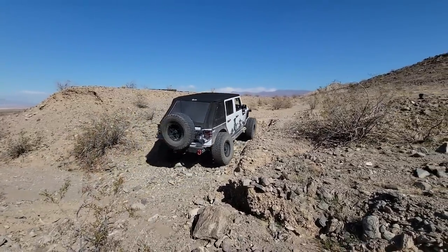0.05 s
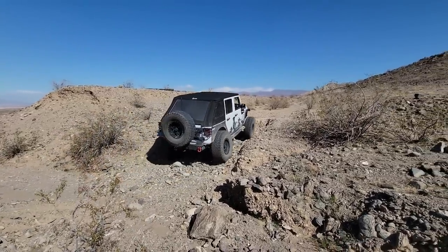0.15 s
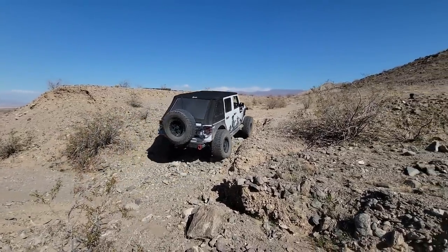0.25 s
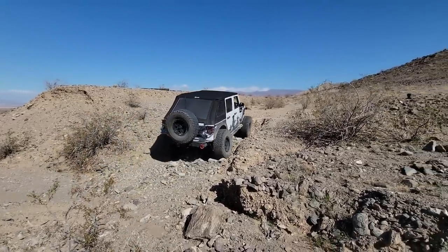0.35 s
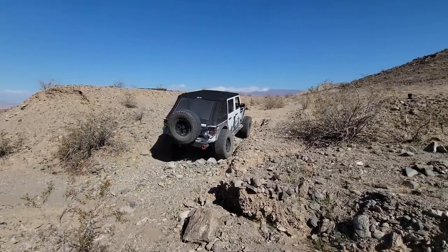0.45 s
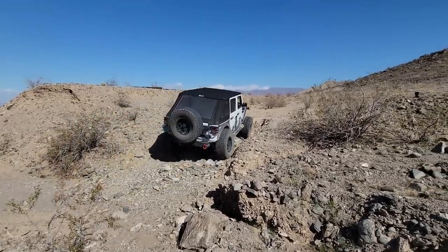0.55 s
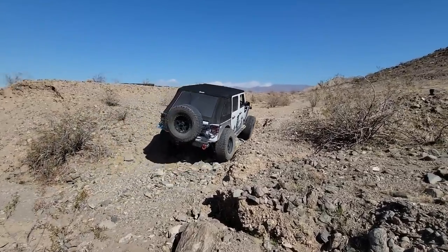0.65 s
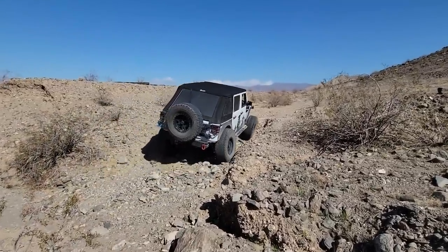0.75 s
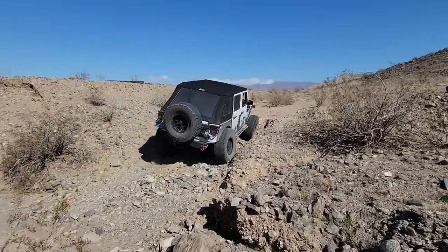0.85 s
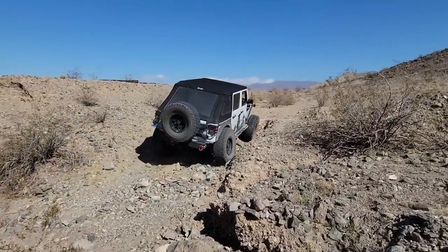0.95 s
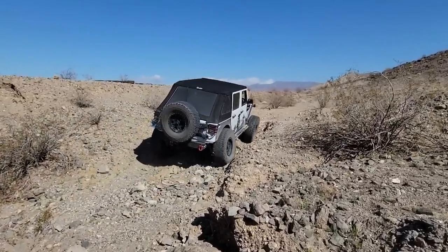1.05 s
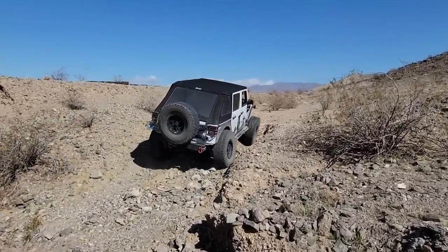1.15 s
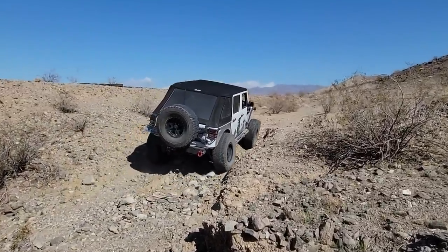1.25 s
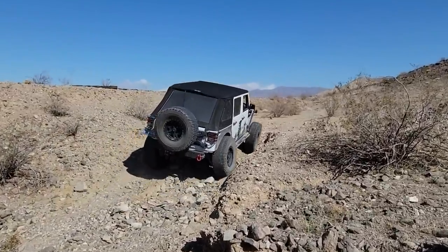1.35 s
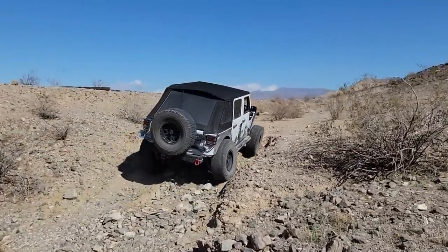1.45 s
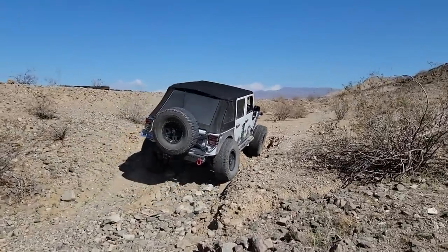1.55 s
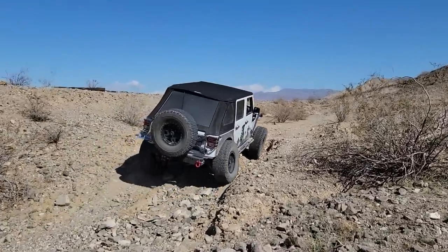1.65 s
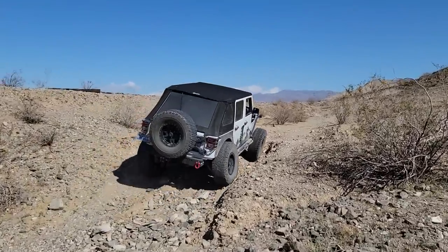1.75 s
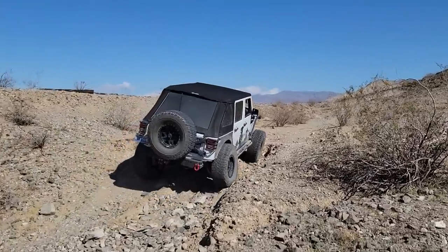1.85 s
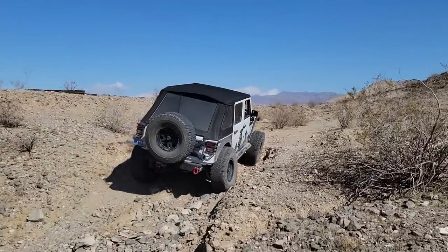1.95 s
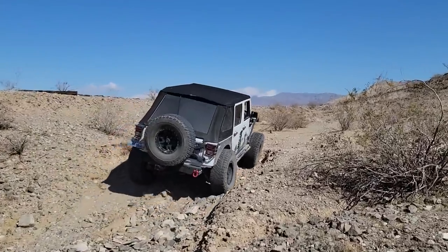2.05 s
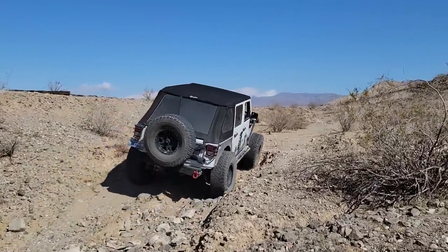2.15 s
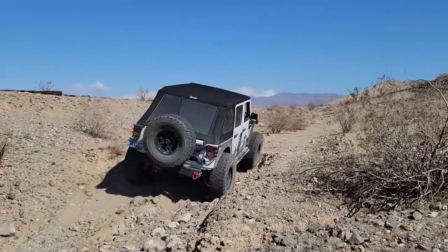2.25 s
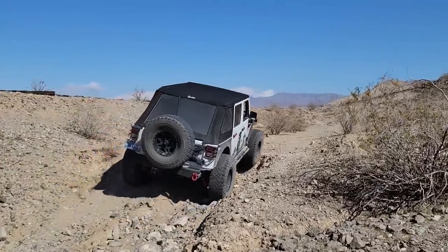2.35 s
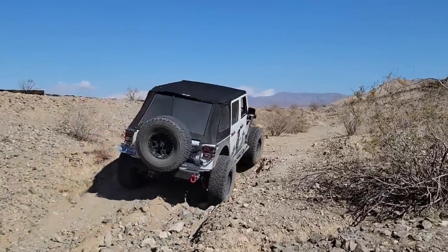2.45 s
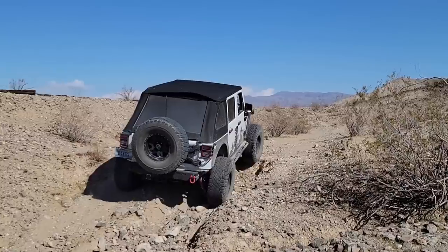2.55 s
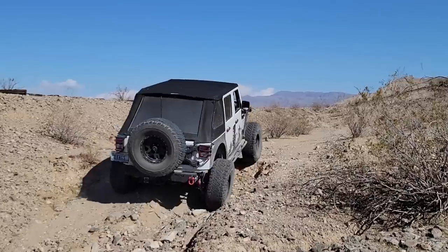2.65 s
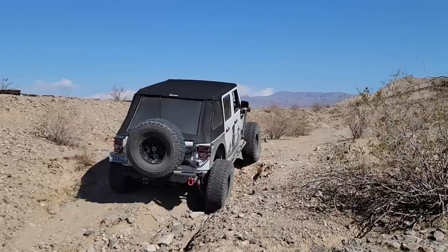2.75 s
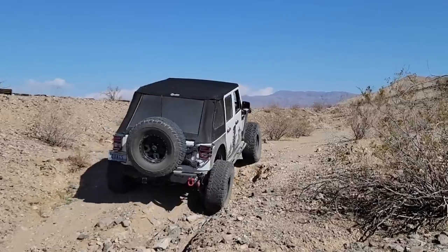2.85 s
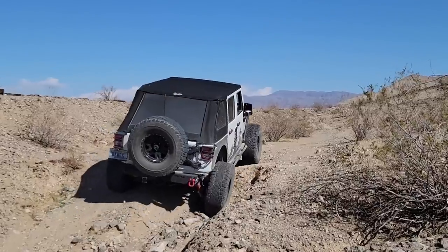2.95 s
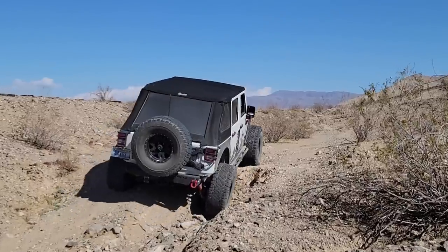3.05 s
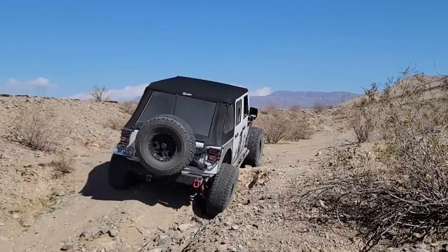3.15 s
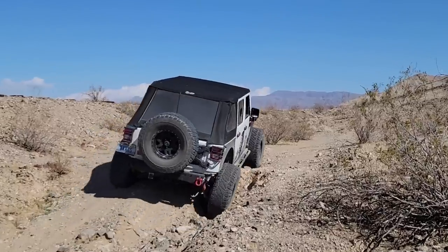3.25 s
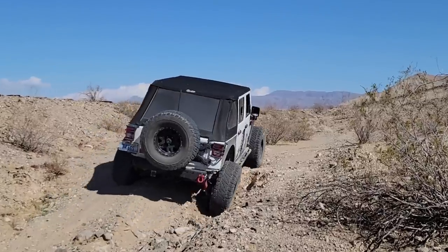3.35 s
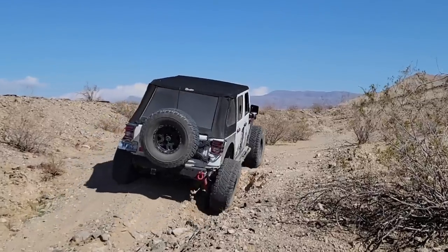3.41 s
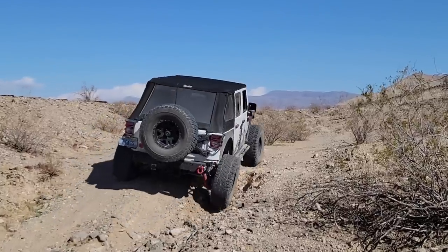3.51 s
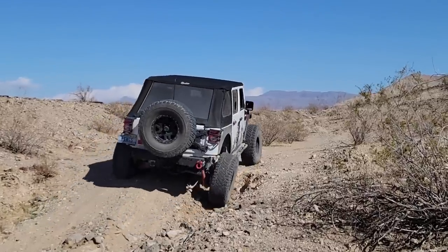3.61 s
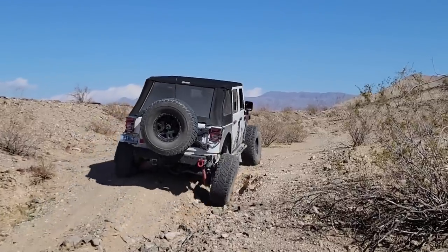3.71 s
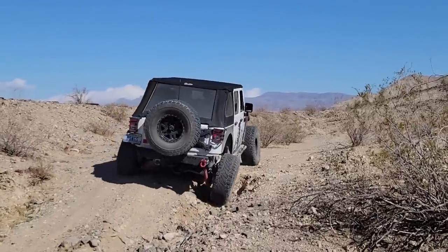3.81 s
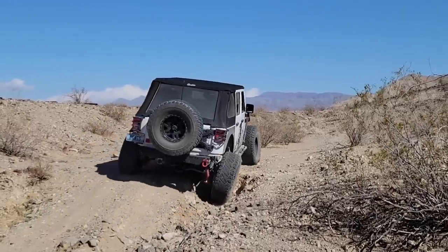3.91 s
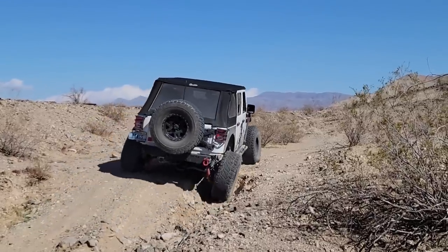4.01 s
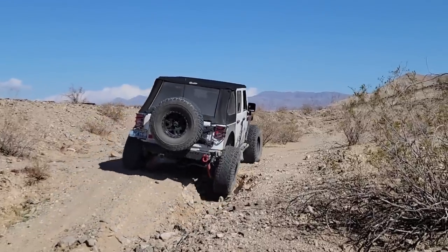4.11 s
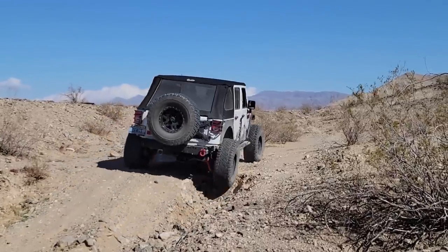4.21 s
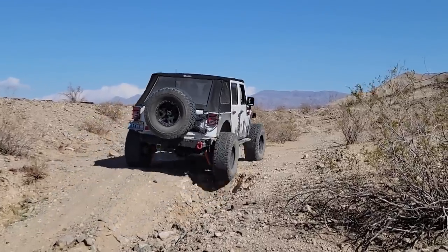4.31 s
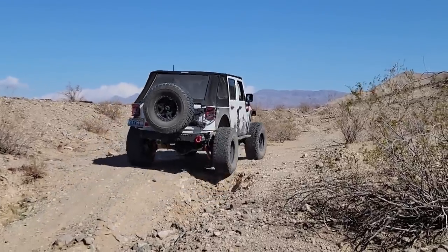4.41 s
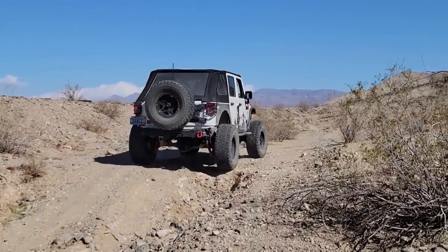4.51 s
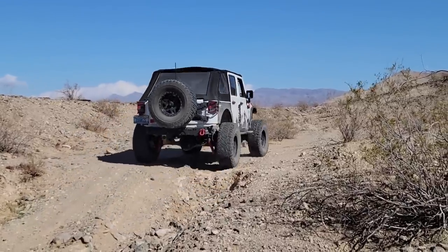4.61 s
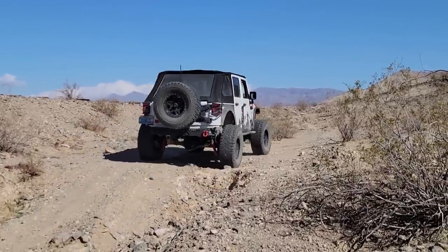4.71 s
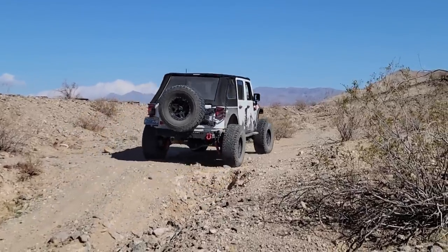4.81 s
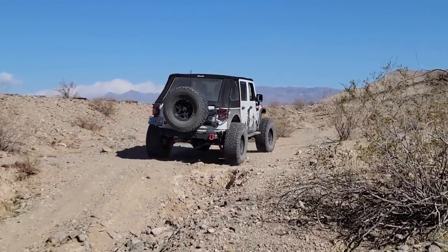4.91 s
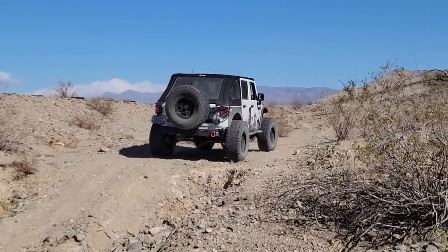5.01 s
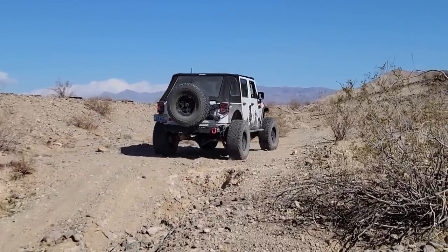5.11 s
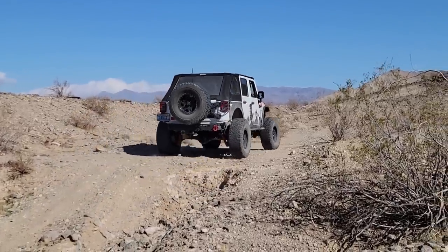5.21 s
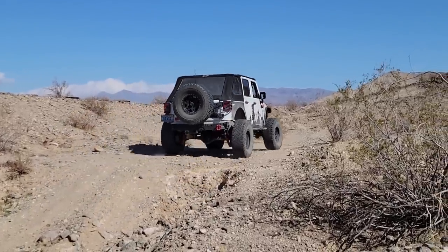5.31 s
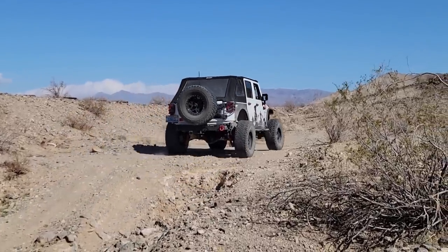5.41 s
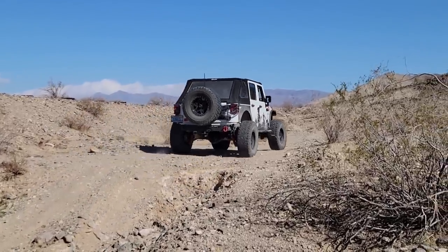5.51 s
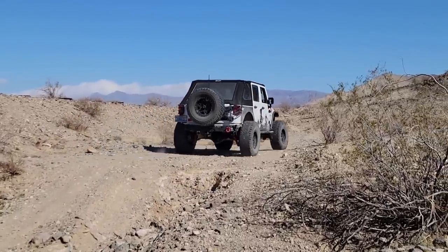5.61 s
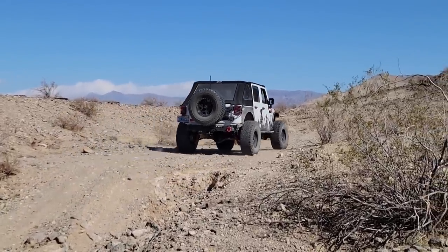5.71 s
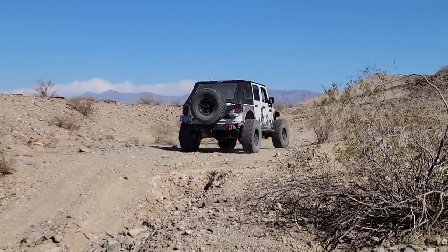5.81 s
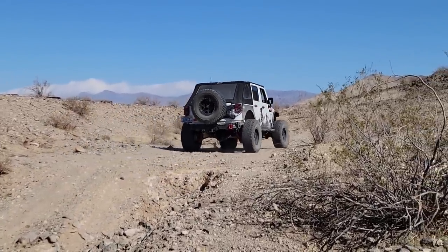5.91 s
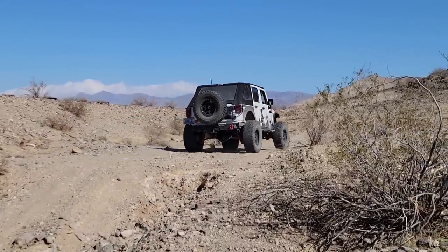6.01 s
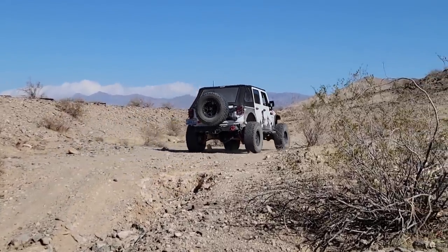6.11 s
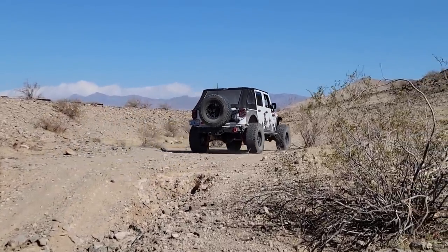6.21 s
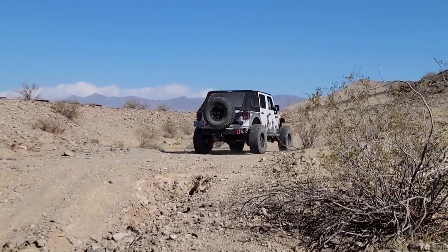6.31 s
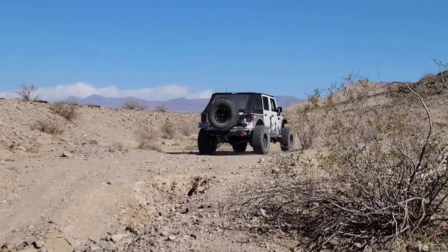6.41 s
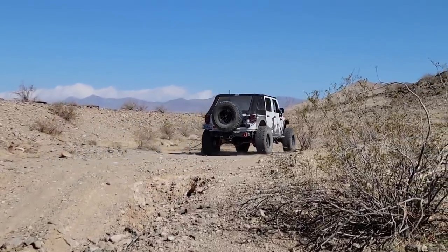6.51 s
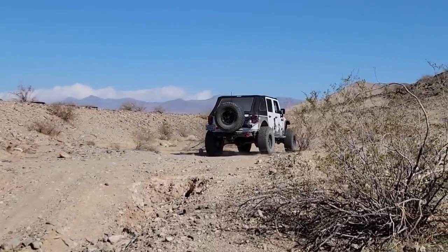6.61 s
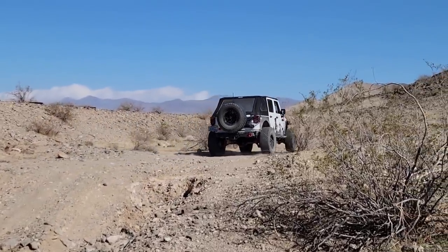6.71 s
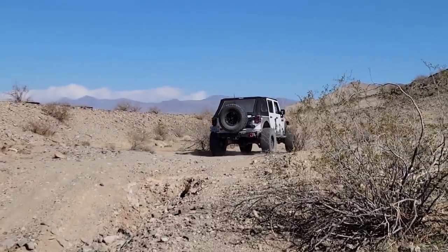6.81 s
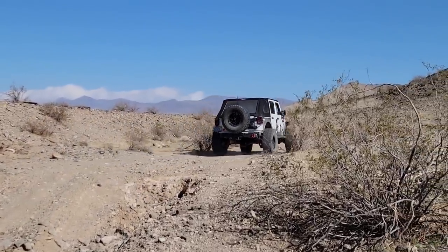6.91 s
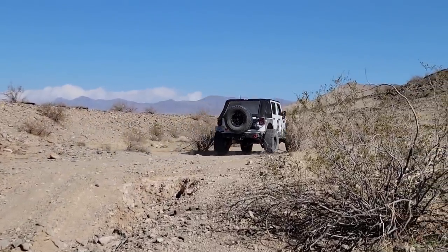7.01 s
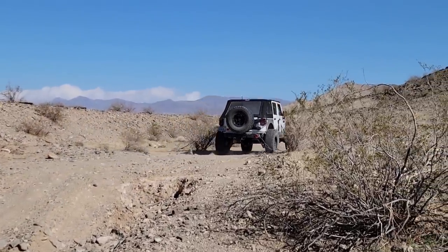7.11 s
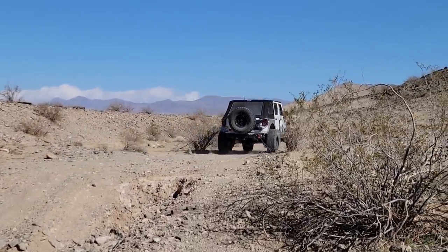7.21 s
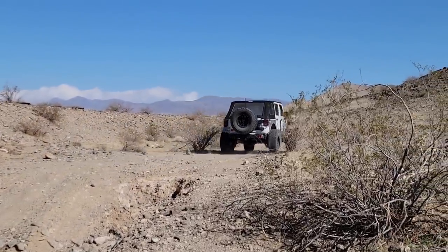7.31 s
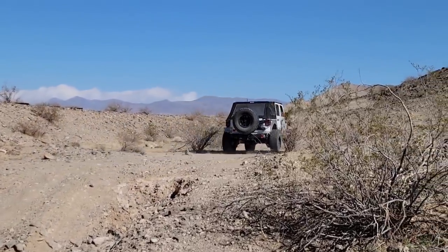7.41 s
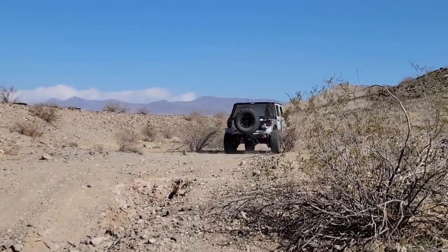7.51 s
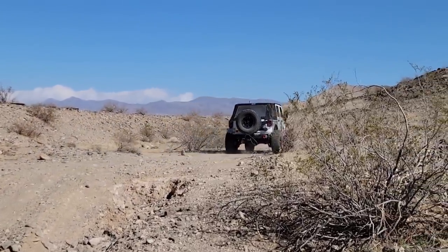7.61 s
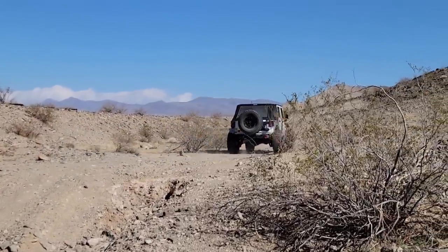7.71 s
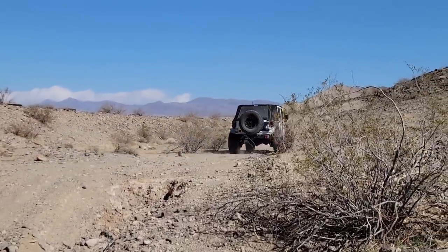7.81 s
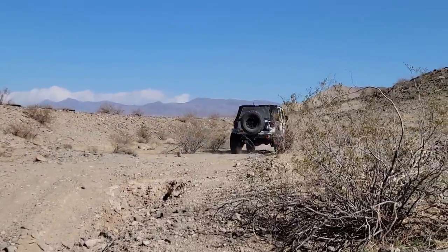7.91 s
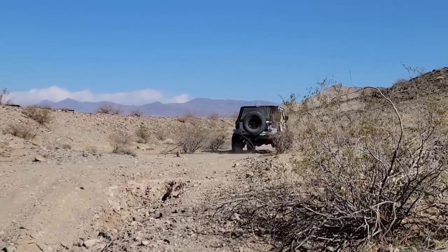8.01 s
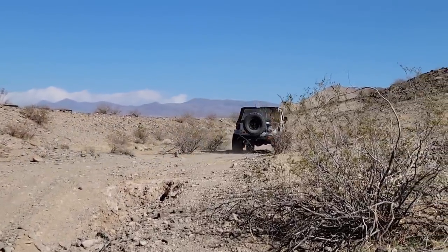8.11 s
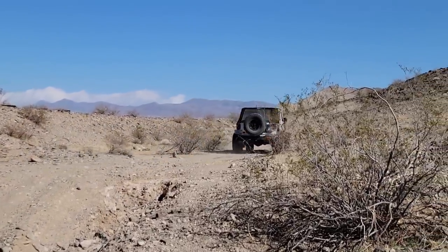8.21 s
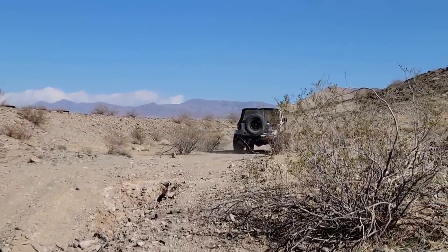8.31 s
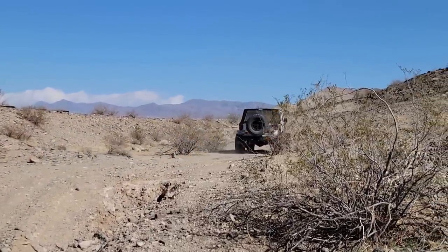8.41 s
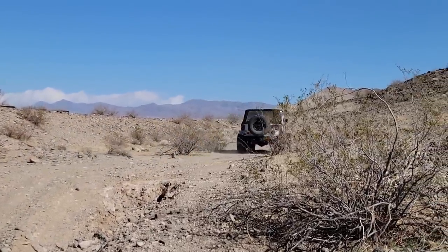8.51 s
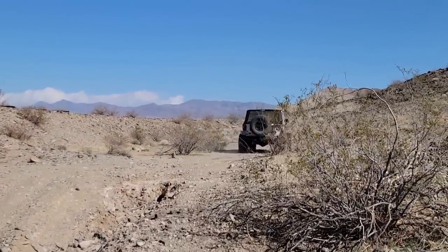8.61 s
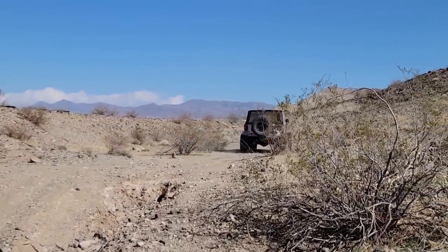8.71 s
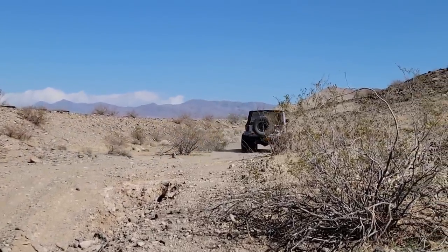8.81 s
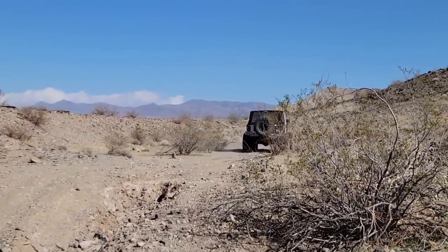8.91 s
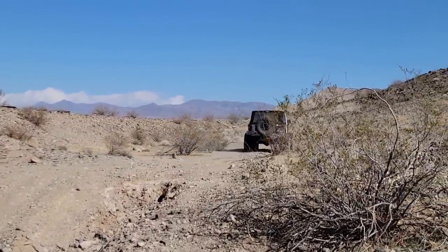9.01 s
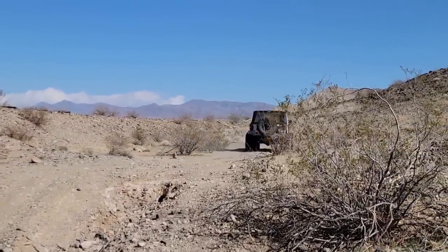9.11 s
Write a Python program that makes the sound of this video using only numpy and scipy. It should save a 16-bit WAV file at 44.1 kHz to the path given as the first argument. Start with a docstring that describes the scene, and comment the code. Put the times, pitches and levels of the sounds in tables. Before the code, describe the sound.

An off-road car climbs a rocky desert wash, heard in stereo by a phone behind it, with low breeze rumble and faint hiss. At 0 s metal chinks lightly over a low, throaty six-cylinder drone, which swells near 0.5 s, then sinks almost away around 1 s as gravel crunches and stones knock. Revs return by 1.3 s, with rubble crunching and clacks until 2 s. The engine eases, then surges loudest at about 2.7 s and sags by 3.5 s. Around 4 s wheels drop with soft, deep thuds; revs build again amid crunches, and a strong dull knock lands near 4.65 s. The engine pulls high and growling until about 5.6 s, then eases. Tyre noise fades after 6 s, the drone almost vanishing near 6.6 s. A brief, more distant rev rises at 7.2 s and dies by 8 s, leaving faint rumble, sparse ticks and weakening wind to about 9 s.

```python
"""Metal chinks and stones start to knock as a six-cylinder off-road car crawls up a rocky desert wash.
Its exhaust drones on multiples of one bank's firing rate, rising and falling with the revs; tyres grind
gravel in noisy bursts, thuds come as wheels drop off rocks, and the engine bay hisses behind them.
After about six seconds the tyre noise fades as the car drives off. All along, a breeze that weakens
towards the end rumbles on the two microphone ports of a phone, over a faint hiss."""
import sys
import numpy as np
from scipy import signal
from scipy.io import wavfile
from scipy.ndimage import uniform_filter1d

SR = 44100
rng = np.random.default_rng(int(sys.argv[2]) if len(sys.argv) > 2 else 0)


def inscribe(sig):
    """Save sig as 16-bit PCM at rate SR to the path in sys.argv[1].

    A 1-D sig is mono; a 2-D sig holds one channel per row.
    Samples are clipped to [-1, 1] before scaling.
    """
    pcm = np.round(np.clip(np.atleast_2d(sig).T, -1, 1) * 32767)
    wavfile.write(sys.argv[1], SR, pcm.astype(np.int16))


N = 403515
T = np.arange(N) / SR  # time of each sample in seconds

# Engine over time: [start_s, one_bank_firing_hz, drone_level_db, brightness_db_per_octave]
ENGINE_TIMES = [(0.0, 35.3, -27, 2.5), (0.25, 32.3, -21, 0), (0.53, 39.32, -16.5, -0.5),
                (0.69, 35.37, -29, 3), (1.02, 24.48, -44.5, 0.5), (1.09, 22.94, -38.5, 6),
                (1.27, 27.35, -17.5, -2), (1.5, 35.47, -19.5, -1), (1.58, 36.94, -20, 1.5),
                (1.76, 39.02, -20.5, -0.5), (2.09, 37.34, -22.5, -1), (2.47, 29.7, -24, 1.5),
                (2.73, 41.15, -12, 0), (2.85, 43.9, -15.5, -0.5), (3.39, 34.7, -26, 2),
                (3.64, 31.93, -25, -0.5), (4.3, 39.57, -18, 0.5), (4.92, 45.12, -16.5, -2),
                (5.63, 44.92, -24.5, 1.5), (5.94, 40.44, -30.5, -2.5), (6.55, 38.84, -50, -4.5),
                (6.62, 35.88, -47.5, -2.5), (6.88, 32.84, -42, -2), (7.08, 41.31, -29, 2.5),
                (7.21, 45.66, -21.5, -1), (7.39, 45.0, -29.5, 1), (7.52, 40.67, -31.5, -1.5),
                (8.03, 39.94, -47, -3.5), (9.15, 28.55, -49.5, 0.5)]
# Lines of the drone; odd ones come from the two banks being unequal: [multiple_of_firing_rate, level_db]
DRONE_LINES = [(1, -27), (2, 2.6), (3, -20), (4, 2.4), (5, -15.5), (6, -3), (7, -14), (8, -9.5), (9, -22.5),
               (10, -12.5), (12, -29), (14, -29)]
# How the exhaust pipe colours the drone: [pitch_hz, level_db]
PIPE_COLOUR = [(40, 2.4), (70, 0.5), (90, -0.9), (115, 5.5), (135, -3), (155, 1.5), (180, -6), (200, 1.5),
               (230, 4.5), (255, -1.5), (275, -2), (295, -8), (318, 5.5), (350, -6.5), (380, -12),
               (425, -10), (480, -11), (550, -6.5), (640, -10)]
# Band of the drone cancelled by the ground echo, lower as the car climbs away: [start_s, pitch_hz, depth_db]
GROUND_NOTCH_TIMES = [(0, 396, -6.5), (2.4, 369, -19.5), (2.9, 288.9, -15.5), (4.2, 280, -11),
                      (4.9, 262, -30), (6, 252, -13.5), (7.1, 208, -31.5), (9.15, 198.9, -6)]
# Strength of each firing in a full cycle: [strength_ratio]
FIRING_STRENGTHS = [2.2, 0.32, 0.84, 0.28, 0.74, 1.1]
# Low pipe resonances: [pitch_hz, width_hz, level_db]
GROWL_MODES = [(319.3, 36, -0.5), (412.8, 25.7, 3.5)]
# Upper pipe resonances: [pitch_hz, width_hz, level_db]
RASP_MODES = [(541.3, 23, 9.5), (600, 480, -16)]
# Loudness of the growl: [start_s, level_db]
GROWL_LEVELS = [(0, -45), (1.2, -71), (1.76, -37), (2.45, -58), (2.85, -26), (3.5, -35.5), (4.4, -26.5),
                (5.6, -28.5), (6.42, -48.5), (6.88, -52.5), (7.21, -41.5), (7.9, -51), (9.15, -65.5)]
# Loudness of the rasp against the growl: [start_s, level_db]
RASP_LEVELS = [(0, -2.5), (2.5, -21), (4, -19), (5.5, -13.5), (7, -11.5), (8, -5.5), (9.15, -13)]
# Bands of the low rumble: [pitch_hz, width_hz, level_db]
RUMBLE_MODES = [(44.3, 28, -4), (90.4, 40, 5), (154, 80, -11.5), (305.3, 20, -0.5), (451, 70, -16)]
# Sizes of stone in the gravel: [pitch_hz, width_hz, level_db]
GRAVEL_MODES = [(611.5, 180, 1), (1086, 316, -3.5), (1344, 280, -9), (1818, 350, -15)]
# A tyre crushing through loose rubble: [start_s, length_s, level_over_steady_grind_db]
CRUNCH_EVENTS = [(0.588, .12, 9.5), (0.767, 0.34, 7.5), (1.39, 0.07, 5.5), (1.509, .15, 8.5),
                 (1.83, .2, 9.5), (2.506, 0.35, 7), (2.896, .22, 3), (4.143, 0.0852, 7), (4.43, 0.083, 9.5),
                 (4.528, 0.15, 8.5), (4.715, 0.18, 6), (5.4, 0.34, 1), (6.02, 0.1, 2.5)]
# Gain of the tyre and bay noises, lost with distance and behind the crest: [start_s, level_db]
DISTANCE_FADE = [(0, 2.2), (2, -1), (4.6, -1.5), (6.1, -4), (6.85, -16), (8.3, -19.5), (9.15, -16.5)]
# Low thuds as a wheel drops off a rock: [start_s, level_db, pitch_hz]
THUD_EVENTS = [(0.87, -18, 73.4), (3.979, -16.5, 78), (4.032, -10, 148), (4.219, -15.5, 68.53),
               (4.751, -19, 100.1), (5.55, -20, 62.02), (6.05, -16.5, 108), (6.441, -21, 82),
               (6.679, -21, 55.4), (7.218, -24, 60.46)]
# Stones knocking under the tyres: [start_s, level_db, pitch_hz]
KNOCK_EVENTS = [(0.358, -27.5, 636), (0.617, -31, 570), (0.673, -23, 635), (0.752, -24, 560),
                (0.804, -23, 582), (0.878, -24, 684), (0.954, -22, 572), (1.425, -23, 696.6),
                (1.633, -25, 696), (1.935, -20.5, 658), (1.98, -18, 615), (3.052, -23.5, 607),
                (3.121, -30, 689.7), (3.865, -24, 605), (3.97, -26, 492), (4.478, -22, 580),
                (4.559, -22, 574.7), (4.621, -18.5, 556), (4.647, -11, 494), (4.961, -23, 509),
                (5.568, -33, 548), (6.076, -27.5, 563.8), (6.521, -33, 1158)]
# Bright clacks of stones: [start_s, level_db, pitch_hz, relative_top_end_db]
CLACK_EVENTS = [(0.3007, -38, 1810, -18), (0.591, -38.5, 1770, -13), (0.6536, -34, 1930, -30),
                (0.7083, -32, 1660, -22), (0.779, -38.5, 2320, -7), (1.04, -34, 2260, -28),
                (1.08, -31.5, 1725, -30), (1.4304, -46, 1700, -27), (1.6455, -38.5, 1470, -29),
                (1.5554, -35.5, 1620, -36), (1.609, -37, 2090, -32), (1.8744, -38, 1960, -24),
                (1.9474, -40.5, 1830, -24), (2.351, -37, 1767, -26), (2.5162, -48, 2820, -10),
                (2.545, -36, 2202, -32), (2.9270, -38, 4350, -17), (3.0535, -36.5, 3570, -32),
                (4.0694, -33.5, 1875, -24), (4.447, -42.5, 3500, -26), (4.4719, -35, 2970, -24),
                (4.497, -35.5, 1710, -33), (4.5859, -40.5, 2820, -36), (4.8345, -36.5, 1728, -12),
                (4.848, -44, 1868, -27), (4.9442, -38, 1898, -16), (5.3715, -42, 3500, -28),
                (5.4045, -40, 2730, -32), (6.1741, -43, 4330, -34), (6.2513, -39, 3220, -36),
                (7.1514, -47, 2286, -35), (7.2738, -53, 2226, -32), (8.4797, -59, 2425, -30),
                (8.9111, -59, 1773, -15)]
# Ringing modes of a clacking stone: [ratio_to_pitch, level_db]
STONE_MODES = [(1, 13), (.56, 3.5), (2, -4.5), (2.1, 11), (2.3, -23.5)]
# Metal shackles chinking as the body rocks: [start_s, level_db, pitch_hz]
CHINK_EVENTS = [(0.017, -32.5, 4540), (0.0974, -36, 2350), (0.3074, -26, 3650), (0.84, -31.5, 2290),
                (2.153, -37, 2850), (2.1923, -37, 3440), (2.9245, -30, 6763)]
# Ringing modes of a shackle: [ratio_to_pitch, level_db]
SHACKLE_MODES = [(1, 1.6), (.7, -10.5), (1.96, -4.5)]
# Bands of the engine bay's hiss: [pitch_hz, width_hz, level_db]
BAY_MODES = [(1490, 1200, -15.5), (2940, 1400, 25), (3870, 710, 20)]
# Bands of the fan noise: [pitch_hz, width_hz, level_db]
FAN_MODES = [(1220, 64, 12), (2475, 140, 4), (4500, 910, -7.5), (8540, 570, -20.5)]
# Loudness of the fan: [start_s, level_db]
FAN_LEVELS = [(0, -67.5), (2.3, -65.5), (3.2, -75.5), (5.8, -62.5), (6.4, -53.5), (6.9, -66), (8.6, -68),
              (8.85, -60.5), (9.15, -59.5)]
# Bands of the flung sand: [pitch_hz, width_hz, level_db]
SAND_MODES = [(6730, 920, 4.5), (8600, 2200, -6), (13100, 3100, -21)]
# Echo off the bank beside the track, which combs the sound: [start_s, share_ratio]
BANK_ECHO_SHARES = [(0, 0.1), (3.4, 0.097), (4.2, 0.44), (6, 0.89), (7, 0.28), (9.15, 0.15)]
# Bounce off the ground: [start_s, share_ratio]
GROUND_SHARES = [(0, 0), (3.3, .05), (3.8, .7), (5.5, .7), (6.3, .25), (9.15, .2)]
# How much later the left port hears the car: [start_s, lag_samples]
LEFT_PORT_LAG = [(0, -4), (1.8, -4), (3.5, 0), (5.5, 3), (9.15, 2)]
# Loudness of the breeze: [start_s, level_db]
BREEZE_LEVELS = [(0, -34), (6, -40), (9.15, -60.5)]
# Gusts on the ports: [start_s, length_s, level_db, left_minus_right_db]
GUST_EVENTS = [(0.664, 0.13, -24, -5), (1.594, 0.4, -35, -7), (2.698, 0.46, -31.5, -3.5),
               (3.97, .3, -24, -16.5), (4.391, .8, -32.5, 4.5), (6.402, 0.33, -45, 20)]
# Colour of the left port: [pitch_hz, width_hz, share_added_ratio]
LEFT_PORT_COLOUR = [(2040, 1700, 0.73), (7900, 5100, -0.6)]

FLYWHEEL_S = .08  # the revs are smoothed over this time
NOTCH_OCTAVES, WAVER_DB = 0.22, 1.1  # width of the notch; each line wavers a little
UNEVEN_DB_PER_HZ = 0.72  # odd multiples grow with the revs
RUMBLE_DB, RUMBLE_FOLLOWS = -30, 0.45  # level when the drone is at -16.5 dB; dB per dB of drone
RUMBLE_LEAST_DB = -40.5  # the rumble's floor, before its random waver
GRIND_DB, BAY_DB, SPRAY_DB = -44, -53.5, -66.5  # before the fade and crunches
CRUNCH_EDGE_S, CRUNCH_BAY, CRUNCH_SPRAY = 0.046, 0.47, 0.51  # shares of its dB in the hiss and the sand
BAY_DB_PER_HZ = 0.11  # the engine bay hisses more at higher revs
# T60 is the time to die away by 60 dB; ROUGH is the random phase step a sample, in radians
THUD_T60_S, THUD_ROUGH = .24, .016
KNOCK_T60_S, KNOCK_ROUGH = .045, .06
CLACK_T60_S, CLACK_ROUGH, CLACK_RISE_S = .05, .08, .0012
CHINK_T60_S, CHINK_ROUGH, CHINK_RISE_S = .09, .055, .003
RINGING, SMALL_CLACK_DB = .12, -50  # share of a clack that rings; least level before the fade
WHINE_HZ, WHINE_DB = 995, -64
BANK_ECHO_S, GROUND_DIP_HZ = 0.002069, 2100
BREEZE_PAN_DB, WIND_WIDTH, GUST_EDGE_S = -12, .55, 0.13  # left minus right; opposed share; edge time
AIR_DB, SELF_NOISE_DB, TOP_HZ = -73, -102, 15700


def undb(db):
    """Turn decibels into gain."""
    return 10 ** (np.asarray(db) / 20)


def unit(x):
    """Scale to an average (rms) strength of 1."""
    return x / np.sqrt(np.mean(x ** 2))


def curves(table):
    """Draw each column of a time table as a curve with one value a sample."""
    s, *columns = np.transpose(table)
    return [np.interp(T, s, column) for column in columns]


def ring(x, hz, width_hz):
    """Resonate at one pitch, with gain 1 at the centre."""
    return signal.lfilter(*signal.iirpeak(hz, hz / width_hz, fs=SR), x)


def body(x, modes):
    """Add up resonances, each filtered twice for steep sides, and scale to rms 1."""
    total = 0
    for hz, width_hz, db in modes:
        stage_width_hz = 1.5 * width_hz  # two passes narrow the band again
        once = ring(x, hz, stage_width_hz)
        total = total + undb(db) * ring(once, hz, stage_width_hz)
    return unit(total)


def walk(rate_hz):
    """Wander at random: hold levels for 1 / rate_hz seconds, smooth them twice and scale to rms 1."""
    hold = int(SR / rate_hz)
    steps = np.repeat(rng.standard_normal(N // hold + 1), hold)
    smooth = uniform_filter1d(uniform_filter1d(steps, hold), hold)
    return unit(smooth[:N])


def grains(per_s, spread_db, bed):
    """Scatter random clicks of uneven size over a bed of noise."""
    size_db = spread_db * np.minimum(rng.exponential(size=N), 2.2)
    happens = rng.random(N) < per_s / SR
    clicks = happens * rng.standard_normal(N) * undb(size_db)
    return unit(clicks) + bed * rng.standard_normal(N)


def spread(make, share):
    """Make a wide source: one part common to both ports, one opposed."""
    return make() + share * make() * np.array([[1], [-1]])


def later(x, delay_s):
    """Delay each channel, even by a fraction of a sample."""
    return np.array([np.interp(T - delay_s, T, channel) for channel in x])


def swell(s, length, edge_s):
    """Rise, hold and fall within 0 to 1; a very short swell stays below 1."""
    return np.clip(np.minimum(T - s, s + length - T) / edge_s + .5, 0, 1)


def blow(s, hz, t60, phase_steps):
    """Give the start sample and a dying tone whose pitch wavers, as from one sharp hit."""
    t = np.arange(len(phase_steps)) / SR
    decay = np.exp(-np.log(1000) * t / t60)
    return int(s * SR), decay * np.sin(2 * np.pi * hz * t + np.cumsum(phase_steps))


def drone(hz, level_db, bright_db, cycles):
    """Add clean lines on multiples of the firing rate, coloured by pipe and ground echo."""
    notch_hz, notch_db = curves(GROUND_NOTCH_TIMES)
    lines = 0
    for k, db in DRONE_LINES:
        octaves_off = np.log2(k * hz / notch_hz)
        pipe_db = np.interp(k * hz, *np.transpose(PIPE_COLOUR))
        colour_db = pipe_db + notch_db * np.exp(-(octaves_off / NOTCH_OCTAVES) ** 2)
        uneven_db = k % 2 * UNEVEN_DB_PER_HZ * (hz - hz.mean())
        line_db = level_db + db + colour_db + bright_db * np.log2(k / 2) + uneven_db + WAVER_DB * walk(16)
        # all multiples dip together once a firing: a sharp suction pulse
        lines = lines - np.sqrt(2) * undb(line_db) * np.cos(k * 2 * np.pi * cycles + 0.21 * k)
    return lines


def pipe_growl(firing, count):
    """Let unequal firing puffs excite the low growl and upper rasp of the pipe."""
    strength = np.array(FIRING_STRENGTHS)[count % len(FIRING_STRENGTHS)]
    puffs = firing * (strength + .3 * rng.standard_normal(N))
    puffs = puffs + 0.045 * rng.standard_normal(N)
    growl = body(puffs, GROWL_MODES) + undb(curves(RASP_LEVELS)[0]) * body(puffs, RASP_MODES)
    return undb(curves(GROWL_LEVELS)[0]) * growl


def rumble(firing, level_db):
    """Shape random firing kicks and noise into a wide rumble that partly follows the drone."""
    def kicks():
        rough = unit(firing * rng.standard_normal(N)) + 2.9 * rng.standard_normal(N)
        return body(rough, RUMBLE_MODES)
    follow_db = RUMBLE_DB + RUMBLE_FOLLOWS * (level_db + 16.5)
    gain = np.hypot(undb(follow_db), undb(RUMBLE_LEAST_DB)) * undb(1.4 * walk(6.2))
    return gain * spread(kicks, 0.12)


def exhaust():
    """Drive drone, growl and rumble from one slightly unsteady firing rate."""
    hz, level_db, bright_db = curves(ENGINE_TIMES)
    hz = uniform_filter1d(hz, int(FLYWHEEL_S * SR))
    cycles = np.cumsum(hz * (1 + .002 * walk(25))) / SR
    count = np.floor(2 * cycles).astype(int)  # firings of both banks
    firing = np.diff(count, prepend=0)
    return drone(hz, level_db, bright_db, cycles) + pipe_growl(firing, count) + rumble(firing, level_db)


def crunch():
    """Add up the level rises in dB as tyres crush loose rubble."""
    return sum(db * swell(s, length, CRUNCH_EDGE_S) for s, length, db in CRUNCH_EVENTS)


def gravel(fade_db, crunch_db):
    """Crackle each size of stone on its own, at its own pitch; the small ones spread wider."""
    stones = 0
    for hz, width_hz, db in GRAVEL_MODES:
        def crackle():
            return body(grains(400, 5.3, 0.44), [(hz, width_hz, 0)])
        stones = stones + undb(db) * spread(crackle, min(hz / 3300, 1))
    return unit(stones) * undb(GRIND_DB + fade_db + crunch_db + 1.5 * walk(25))


def thuds():
    """Bump softly and roughly, like tyre and suspension, with quickly dying low tones."""
    out, t = np.zeros(N + 20000), np.arange(20000) / SR
    for s, db, hz in THUD_EVENTS:
        i, hit = blow(s, hz, THUD_T60_S, THUD_ROUGH * rng.standard_normal(20000))
        soft_hit = hit * (1 - np.exp(-t / 0.0099))
        out[i:i + 20000] += undb(db) * ring(soft_hit, hz, 4.5 * hz)
    return out[:N]


def knocks():
    """Hit dully, like stones rolling over under the tread, each with a rougher overtone."""
    out, t = np.zeros(N + 6000), np.arange(6000) / SR
    for s, db, hz in KNOCK_EVENTS:
        chance = rng.standard_normal((2, 6000))
        i, hit = blow(s, hz, KNOCK_T60_S, KNOCK_ROUGH * chance[0])
        _, overtone = blow(s, 2 * hz, .5 * KNOCK_T60_S, 2 * KNOCK_ROUGH * chance[1])
        out[i:i + 6000] += 1.49 * undb(db) * (hit + 0.4 * overtone) * (1 - np.exp(-t / 0.0022))
    return out[:N]


def small_clacks(count=24):
    """Scatter many faint clacks at random times, fading with the car."""
    when, size, pitch = rng.random((count, 3)).T
    start_s = when * T[-1]
    level_db = SMALL_CLACK_DB + 6 * size + np.interp(start_s, *np.transpose(DISTANCE_FADE))
    pitch_hz = 1700 * 1.8 ** pitch
    return [(s, db, hz, -25) for s, db, hz in zip(start_s, level_db, pitch_hz)]


def clacks():
    """Mix a tick, a dry snap of quick cracks, a share of ringing modes and a rattling top end."""
    out, t = np.zeros(N + 6000), np.arange(6000) / SR
    for s, db, hz, top_db in CLACK_EVENTS + small_clacks():
        chance = rng.standard_normal((8, 6000))
        modes = 0
        for (ratio, mode_db), c in zip(STONE_MODES, chance[3:]):
            _, tone = blow(s, ratio * hz, CLACK_T60_S, CLACK_ROUGH * c)
            modes = modes + undb(mode_db) * (ratio * hz < 8000) * tone  # no modes from 8 kHz up
        rattle = undb(2.8 * unit(uniform_filter1d(chance[0], 120))) * (1 - np.exp(-t / CLACK_RISE_S))
        cracks = body(chance[1], [(hz, 0.47 * hz, 0), (0.43 * hz, 0.25 * hz, 1.5)])
        snap = cracks * np.exp(-t / 0.017) * rattle
        top = body(chance[2], [(6200, 670, 0)]) * np.exp(-t / 0.11) * rattle
        tick = body(chance[1], [(2150, 3600, 0)]) * np.exp(-t / 0.001)
        dry_part = 0.87 * (1 - RINGING) * (snap + 1.1 * tick)
        i = int(s * SR)
        out[i:i + 6000] += undb(db) * (1.72 * RINGING * modes + dry_part + 1.3 * undb(top_db) * top)
    return out[:N]


def chinks():
    """Ring metal shackles briefly and clearly at a few modes each."""
    out, t = np.zeros(N + 6000), np.arange(6000) / SR
    rise = 1 - np.exp(-t / CHINK_RISE_S)
    for s, db, hz in CHINK_EVENTS:
        for ratio, mode_db in SHACKLE_MODES:
            i, hit = blow(s, ratio * hz, CHINK_T60_S, CHINK_ROUGH * rng.standard_normal(6000))
            out[i:i + 6000] += undb(db + mode_db) * (ratio * hz < 8000) * hit * rise
    return out[:N]


def sand_spray(fade_db, crunch_db):
    """Hiss like flung sand: dense fine grains in high bands, stronger in the crunches."""
    level_db = SPRAY_DB + fade_db + CRUNCH_SPRAY * crunch_db + 1.1 * walk(17)
    return spread(lambda: body(grains(2500, 4, 2.6), SAND_MODES), 0.99) * undb(level_db)


def engine_bay(fade_db, crunch_db):
    """Hiss with grainy noise that grows with the revs and the crunches."""
    revs = curves(ENGINE_TIMES)[0]
    level_db = BAY_DB + fade_db + CRUNCH_BAY * crunch_db + BAY_DB_PER_HZ * (revs - revs.mean())
    return spread(lambda: body(grains(1500, 5, 1.5), BAY_MODES), .45) * undb(level_db + .8 * walk(16))


def fan():
    """Blow smooth noise through the fan's bands at its own changing level."""
    return spread(lambda: body(rng.standard_normal(N), FAN_MODES), 0.37) * undb(curves(FAN_LEVELS)[0])


def whine():
    """Hold one faint, steady tone."""
    return undb(WHINE_DB) * np.sin(2 * np.pi * WHINE_HZ * T)


def reflections(noise):
    """Add a dull echo off the bank and a bounce off the ground; delayed copies comb the sound."""
    dull = signal.lfilter(*signal.butter(2, 2600, fs=SR), noise)
    softened = signal.lfilter(*signal.butter(1, 5000, fs=SR), noise)
    # half a period late cancels the dip pitch; the softening filter adds about 0.03 ms itself
    bounce = later(softened, .5 / GROUND_DIP_HZ - .00003)
    echo = later(dull, BANK_ECHO_S)
    return noise + curves(BANK_ECHO_SHARES)[0] * echo + curves(GROUND_SHARES)[0] * bounce


def breeze():
    """Flutter a low wind noise on the ports, with a few stronger gusts."""
    def pan(db):
        return undb(np.array([[db], [-db]]) / 2)
    gain = undb(curves(BREEZE_LEVELS)[0]) * pan(BREEZE_PAN_DB)
    for s, length, db, pan_db in GUST_EVENTS:
        gain = gain + undb(db) * swell(s, length, GUST_EDGE_S) * pan(pan_db)
    wind = spread(lambda: body(rng.standard_normal(N), [(50.3, 61, 5.5), (121, 70, -14.5)]), WIND_WIDTH)
    return wind * gain * undb(3.8 * walk(27))


def air():
    """Lay down a faint, steady, broad noise around 1500 Hz."""
    return undb(AIR_DB) * spread(lambda: unit(ring(rng.standard_normal(N), 1500, 2500)), .6)


def scene():
    """Mix the car, let it reach the two ports a few samples apart, and add breeze and air."""
    fade_db, crunch_db = curves(DISTANCE_FADE)[0], crunch()
    noise = gravel(fade_db, crunch_db) + clacks() + chinks()
    noise = noise + sand_spray(fade_db, crunch_db) + engine_bay(fade_db, crunch_db) + fan()
    car = exhaust() + thuds() + knocks() + whine() + reflections(noise)
    half_lag_s = curves(LEFT_PORT_LAG)[0] / SR / 2
    left = np.interp(T - half_lag_s, T, car[0])
    right = np.interp(T + half_lag_s, T, car[1])
    return np.array([left, right]) + breeze() + air()


def record(dry):
    """Colour the left port, add the phone's faint hiss, cut deep bass, round peaks and cut the top."""
    left = dry[0] + sum(share * ring(dry[0], hz, width_hz) for hz, width_hz, share in LEFT_PORT_COLOUR)
    hiss = undb(SELF_NOISE_DB) * spread(lambda: rng.standard_normal(N), .5)
    heard = np.array([left, dry[1]]) + hiss
    low_cut = signal.butter(3, 38, "high", fs=SR, output="sos")
    rounded = np.tanh(0.7 * signal.sosfilt(low_cut, heard)) / 0.87
    top_cut = signal.ellip(8, .2, 70, TOP_HZ, fs=SR, output="sos")
    return signal.sosfilt(top_cut, rounded)


dry = scene()
out = record(dry)
inscribe(out)
```